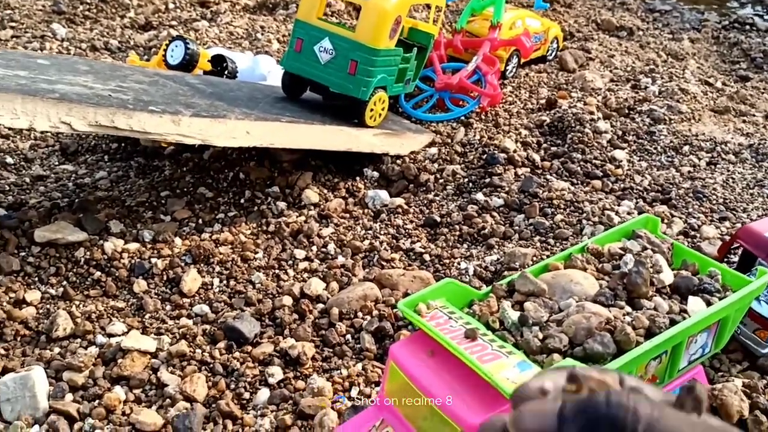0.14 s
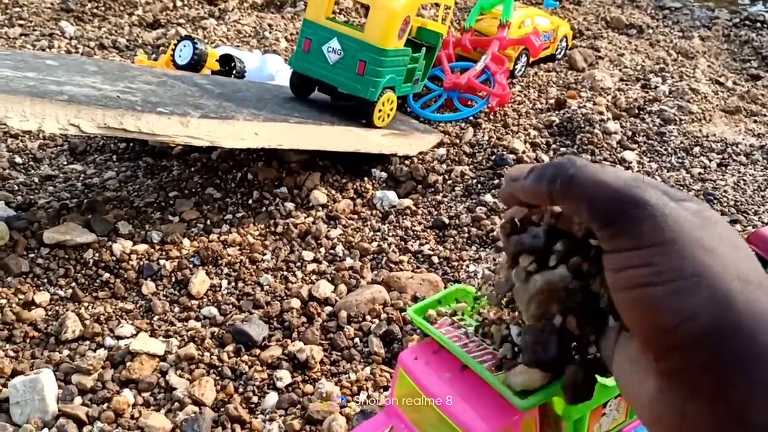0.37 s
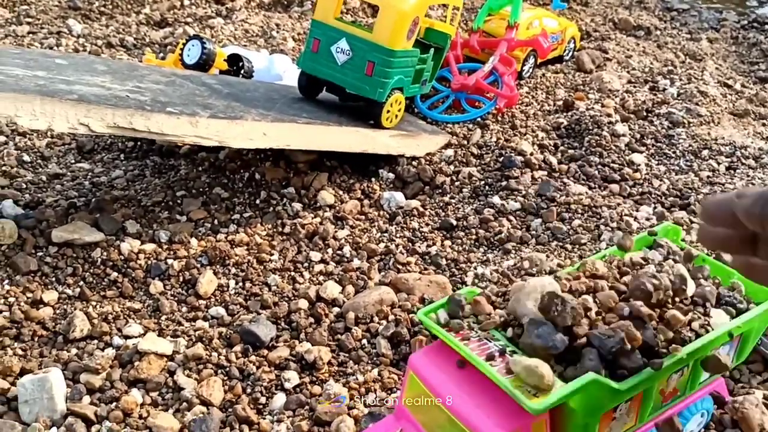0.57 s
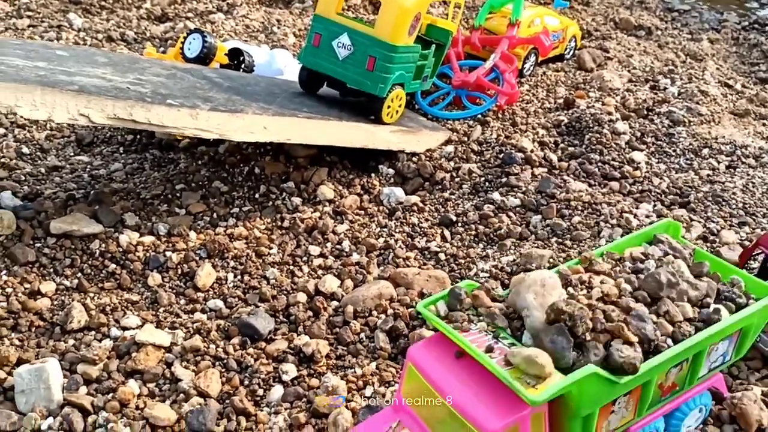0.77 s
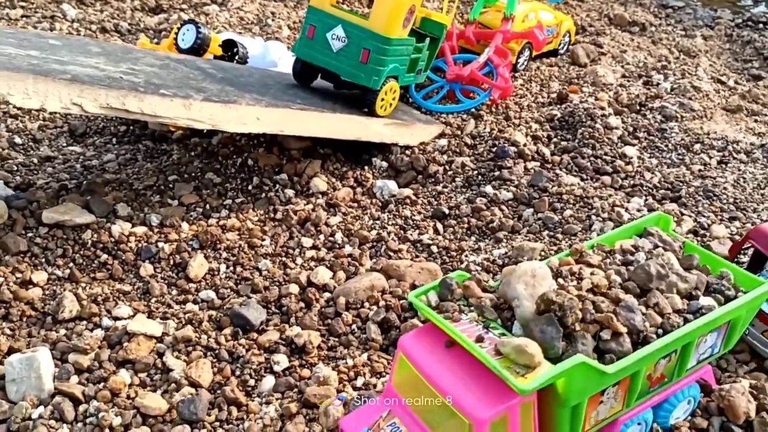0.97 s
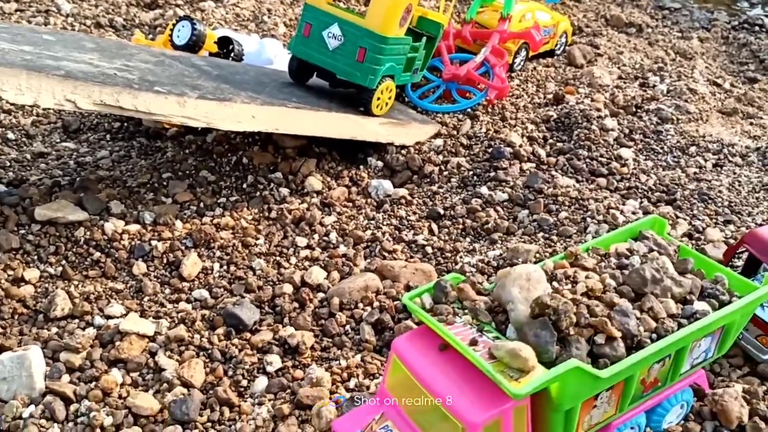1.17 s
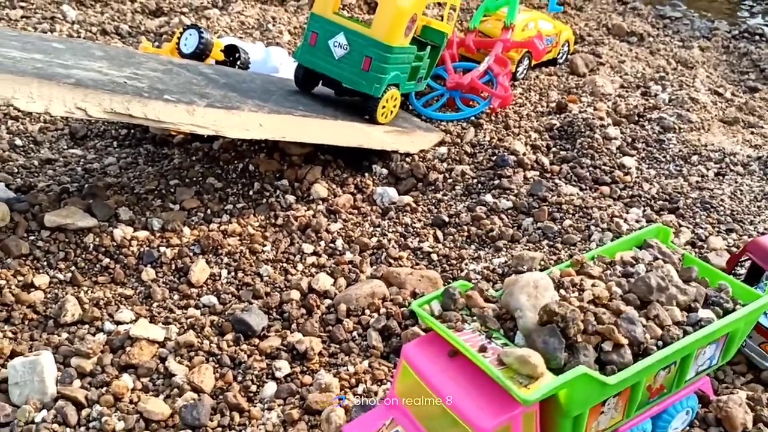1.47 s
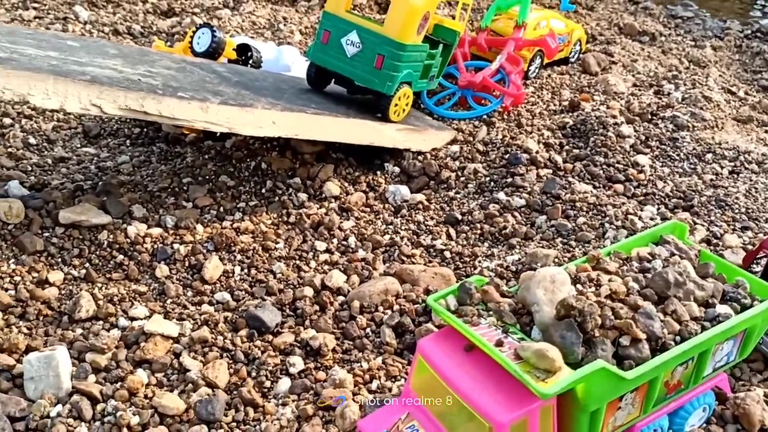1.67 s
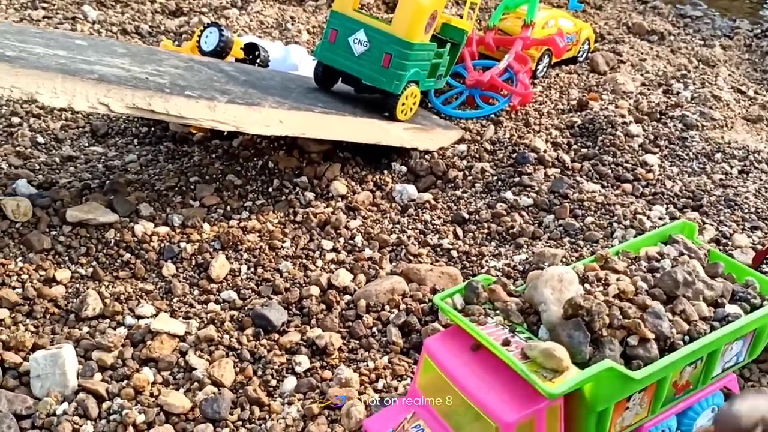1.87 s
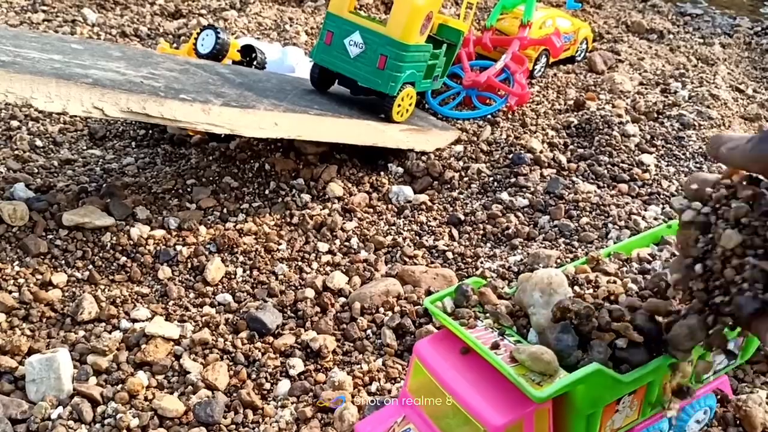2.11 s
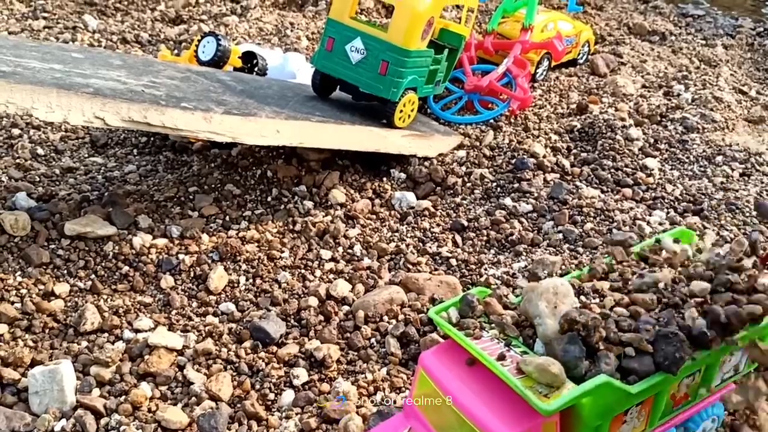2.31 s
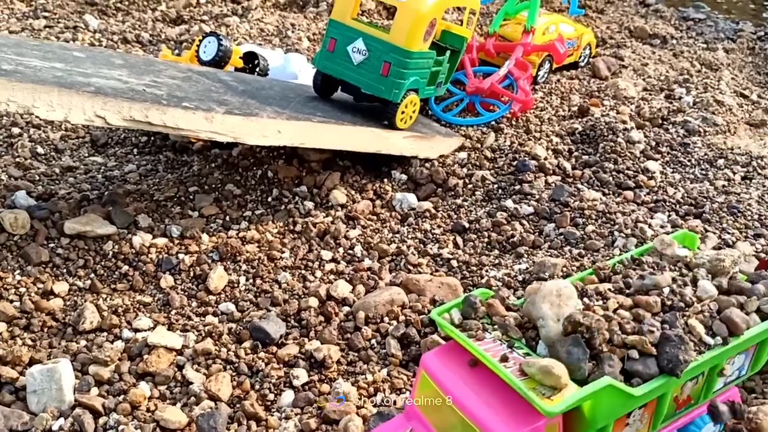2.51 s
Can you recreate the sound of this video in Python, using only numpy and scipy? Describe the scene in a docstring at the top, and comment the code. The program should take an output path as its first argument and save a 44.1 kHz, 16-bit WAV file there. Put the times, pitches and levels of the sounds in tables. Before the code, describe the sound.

Two short gravel pours clatter into a small plastic truck bed, separated by a softer, crisp scrape of fingers scooping stony ground. Close and dry, open air with a faint low rumble beneath.

```python
"""Outdoor air hisses and rumbles faintly throughout, as filtered noise; grit crackles in a hand as sparse ticks.
A handful of gravel and damp soil is poured into the part-filled plastic bed of a toy truck, close by:
pebbles tick, clack and clink and knock the bed as timed filtered impacts, and grit streams as showers of grains.
A hand then rakes the next handful from the stony ground, in denser grains and a dull rub; a second pour follows."""
import sys
import numpy as np
from scipy import signal
from scipy.fft import rfft, irfft, next_fast_len
from scipy.io import wavfile
from scipy.ndimage import uniform_filter1d, minimum_filter1d, map_coordinates

SR = 44100
rng = np.random.default_rng(int(sys.argv[2]) if len(sys.argv) > 2 else 0)


def persist_wave(psi):
    """Save psi, clipped to +-1, as 16-bit WAV."""
    counts = np.round(np.clip(psi, -1, 1) * 32767).astype(np.int16)
    wavfile.write(sys.argv[1], SR, np.atleast_2d(counts).T)


N = 116865

TOP_HZ = 15900  # band limit
LEVEL_WINDOW_S = 0.004  # an impact's level spreads its whole energy over this time
ATTACK_S = 0.00046  # time constant of a contact's rise
TICK_T60_S, CLACK_T60_S = 0.0039, 0.0083
CHATTER_DB, CHATTER_T60_S = -21.5, 0.019  # neighbours shaken by each impact
STONE_SPREAD_DB = 3.5  # uneven colour, drawn for each impact
PITCH_RANGE_OCT = 0.46  # small contacts differ by up to this, either way
CLUMP_DB, CLUMP_KNOTS_PER_S = 1.5, 90  # grit moves in small clumps
FADE_20DB_S = 0.059  # time to fall 20 dB outside a level curve

# Stony clack spectrum: freq_hz, relative_density_db
CLACK_COLOUR = [(100, -55), (400, -25.5), (1200, -8.5), (1700, -8.5), (2200, -2.5), (2700, -2.5),
                (3600, 4.5), (4400, 3), (5200, 3), (6500, -1.5), (10000, -14)]
# Plastic bed spectrum, before pitch shifting: freq_hz, relative_density_db
BED_COLOUR = [(40, -58), (100, -32), (200, -26.5), (400, -11), (560, -11), (740, -2.5), (980, 7.5),
              (1250, -4.5), (1550, -5.5), (2000, -5.5), (4000, -13.5), (12000, -23.5)]
# Spectrum of raked or held grit: freq_hz, relative_density_db
RAKED_GRIT_COLOUR = [(100, -27), (1000, -18.5), (3000, -10), (4500, -1), (6200, -2), (7900, 5.5),
                     (10000, -4), (12500, 1.5), (15500, 3.5)]


def amp(db):
    """Decibels to gain."""
    return 10 ** (np.asarray(db) / 20)


def unit(x):
    """Scale to rms 1."""
    return x / np.sqrt(np.mean(x ** 2) + 1e-20)


def wobble(knots_per_s):
    """Smooth random curve through normally distributed knots."""
    knots = rng.standard_normal(int(N * knots_per_s / SR) + 4)
    return map_coordinates(knots, [np.arange(N) * knots_per_s / SR])


def response(colour, size=2048):
    """Minimum-phase impulse response of a colour, attenuated above the band limit."""
    hz, db = np.transpose(colour)
    freq_hz = np.fft.rfftfreq(size, 1 / SR)
    closing_db = np.interp(freq_hz, [TOP_HZ, TOP_HZ + 1500], [0, -30])
    colour_db = np.interp(np.log(freq_hz + 1), np.log(hz), db)
    cepstrum = irfft(np.log(amp(colour_db + closing_db)))
    # fold the cepstrum to make the response causal
    cepstrum[1:size // 2] *= 2
    cepstrum[size // 2 + 1:] = 0
    return irfft(np.exp(rfft(cepstrum)))[:size // 2]


def coloured(x, colour):
    """Filter x through a colour, to rms 1."""
    return unit(signal.fftconvolve(x, response(colour))[:len(x)])


def levels(rows):
    """One gain curve per dB column, fading outside the rows' span."""
    t = np.arange(N) / SR
    time_s, *columns_db = np.transpose(rows)
    outside_s = np.maximum(time_s[0] - t, 0) + np.maximum(t - time_s[-1], 0)
    fade_db = -20 * outside_s / FADE_20DB_S
    return [amp(np.interp(t, time_s, db) + fade_db) for db in columns_db]


def burst(t60_s, size=1800):
    """One contact: a noise jolt that dies in milliseconds, then faint chatter."""
    t = np.arange(size) / SR
    jolt = amp(-60 * t / t60_s)
    chatter = amp(CHATTER_DB - 60 * t / CHATTER_T60_S)
    rise = 1 - np.exp(-t / ATTACK_S)
    return rng.standard_normal(size) * (jolt + chatter) * rise


def grains(colour, per_s, spread_db, t60_s, range_oct=0, count=16):
    """Random shower of tiny contacts of many sizes and count shapes and pitches, at rms 1."""
    out = np.zeros(N)
    for shift in np.linspace(-1, 1, count):
        falls = rng.random(N) < per_s / SR / count
        sizes = amp(spread_db * np.clip(rng.standard_normal(N), -2, 1.5))
        shifted = np.array(colour) * [2 ** (range_oct * shift), 1]
        contact = coloured(burst(t60_s), shifted)
        out += signal.fftconvolve(falls * sizes, contact)[:N]
    return unit(out)


def clumps():
    """Random gain as grit bunches up and thins out."""
    return amp(CLUMP_DB * wobble(CLUMP_KNOTS_PER_S))


def add_at(out, start_s, db, hit):
    """Add a hit of rms 1, its level set by its energy."""
    gain = amp(db) * np.sqrt(LEVEL_WINDOW_S * SR / len(hit))
    out[round(start_s * SR):][:len(hit)] += gain * hit


def add_impact(out, start_s, db, colour, push):
    """Filter a push through a randomly uneven colour and add it."""
    hz, colour_db = np.transpose(colour)
    uneven_db = colour_db + STONE_SPREAD_DB * rng.standard_normal(len(hz))
    add_at(out, start_s, db, coloured(push, np.transpose([hz, uneven_db])))


def air():
    """Near-steady outdoor hiss with a low, distant rumble: filtered noise."""
    # Air spectrum: freq_hz, relative_density_db
    air_colour = [(30, -43), (55, -10), (82, 4.5), (115, -4), (200, -2.5), (320, -9), (480, -7.5),
                  (1100, -20), (2400, -20.5), (6000, -15.5), (7800, -6.5), (10000, -18.5), (12500, -18),
                  (15500, 5)]
    level_db = -43.5 + 0.22 * wobble(8.1)
    return amp(level_db) * coloured(rng.standard_normal(N), air_colour)


def handful():
    """Sparse small ticks as the held stones shift and crumbs drop."""
    # Grit crackling in the hand: time_s, level_db
    crackle_rows = [(0, -40.5), (.2, -38.5), (.3, -44.5), (1.5, -46.5), (1.62, -41.5), (1.88, -45.5),
                    (2.0, -45), (2.65, -39)]
    level, = levels(crackle_rows)
    return level * grains(RAKED_GRIT_COLOUR, per_s=280, spread_db=3.5, t60_s=0.0015)


def pebbles():
    """Stone on stone: a very short tick over a slightly longer clack."""
    # Sharp tick spectrum: freq_hz, relative_density_db
    tick_colour = [(150, -81), (1000, -41), (2500, -44), (4000, -9.5), (6000, -3), (7500, 5), (8500, 1),
                   (10000, -5.5), (12500, -6), (15500, -1.5)]
    # Pebble impacts: start_s, tick_db, clack_db (before trim), tick_top_db (more for small stones)
    click_rows = [(0.0438, -36, -33, -13), (0.118, -26, -59, 21.5), (0.2421, -31, -26, 6),
                  (0.2517, -29.5, -26.5, 6), (0.2672, -27, -30.5, 16), (0.295, -15.5, -30, -11),
                  (0.2958, -22, -32, 4), (0.3023, -22, -35, 1), (0.3308, -16.5, -25.5, 5),
                  (0.3554, -20.5, -27.5, 0), (0.3705, -21.5, -27.5, 10), (0.4035, -20.5, -31, 18),
                  (0.4074, -17.5, -32, 10), (0.4268, -19.5, -25, 12), (0.4337, -30, -27, 6),
                  (0.447, -22.5, -21.5, 5), (0.4804, -22, -38, 21), (0.506, -29, -28, -4),
                  (0.5123, -19, -23, -13), (0.5237, -19, -30, -4), (0.5514, -20, -20.5, -3),
                  (0.58, -22.5, -38, -3), (0.5974, -24, -39, -13), (0.6244, -24, -30, -1),
                  (0.6367, -23, -34, -7), (0.66, -26, -44, 18), (0.6721, -22, -29.5, -8),
                  (0.7008, -29, -33, 10), (0.7154, -30.5, -34, 0), (0.7652, -18, -32, 20),
                  (0.8007, -26.5, -35.5, -1), (0.8825, -27.5, -41, 4), (0.9135, -25.5, -40.5, 0.5),
                  (1.07, -21, -54, 13), (1.0767, -27, -53, 9), (1.6033, -24.5, -39.5, -2),
                  (1.7824, -27, -65, 22), (1.9564, -18, -35, -5), (2.0281, -18, -28.5, 14.5),
                  (2.0604, -23, -25.5, 4), (2.0744, -23, -27.5, 6), (2.1017, -27, -28, 3),
                  (2.1341, -17.5, -23.5, 0), (2.1477, -17.5, -24.5, 4), (2.152, -24, -21.5, -4),
                  (2.1566, -16.5, -24.5, -8), (2.1609, -23, -18, -5), (2.1786, -23, -27, 12),
                  (2.2018, -18, -32, 4), (2.2096, -17, -26, 0), (2.2177, -20, -15.5, -8),
                  (2.221, -15, -18, -6), (2.2383, -19.5, -21, -1), (2.2419, -29, -20.5, -7),
                  (2.2547, -23, -17, 5), (2.26, -24, -22, 6), (2.2814, -25, -24, -12),
                  (2.288, -24, -25, -17), (2.3177, -19, -22.5, -39), (2.343, -23.5, -37, 2),
                  (2.3776, -21, -29, -4), (2.4043, -22, -19, -14), (2.4198, -42, -22, 2),
                  (2.4275, -31, -29, 0), (2.4399, -22.5, -27, -19), (2.52, -20, -35, 20),
                  (2.527, -17.5, -28.5, 20), (2.5843, -27, -59, 20), (2.598, -31.5, -38.5, -4)]
    tick_trim_db, clack_trim_db = -1, -0.5
    out = np.zeros(N + SR)
    for start_s, tick_db, clack_db, top_db in click_rows:
        tick = [(hz, db + top_db * np.interp(hz, [7500, 14000], [0, 1])) for hz, db in tick_colour]
        add_impact(out, start_s, tick_db + tick_trim_db, tick, burst(TICK_T60_S))
        add_impact(out, start_s, clack_db + clack_trim_db, CLACK_COLOUR, burst(CLACK_T60_S))
    return out[:N]


def pour(rows):
    """Fine grit and small stones patter on the pile in clumps; heavier crumbs drum on the bed."""
    # Poured grit spectrum: freq_hz, relative_density_db
    grit_colour = [(100, -49), (700, -16), (2000, -10), (3700, 1), (6000, -0.5), (7800, 5.5), (10000, -3.5),
                   (12500, -2.5), (15500, 6)]
    treble, middle = levels(rows)
    grit = grains(grit_colour, per_s=1000, spread_db=5.5, t60_s=0.0051)
    stones = grains(CLACK_COLOUR, per_s=170, spread_db=2.5, t60_s=TICK_T60_S, range_oct=PITCH_RANGE_OCT)
    crumbs = grains(BED_COLOUR, per_s=450, spread_db=5.0, t60_s=0.0051, range_oct=PITCH_RANGE_OCT)
    patter = treble * (amp(-2.5) * grit + amp(-9.5) * stones)
    drumming = amp(-1) * middle * crumbs
    return clumps() * (patter + drumming)


def knocks():
    """The loaded bed answers a blow and its rattle with a dead, hollow knock, pitched by landing place."""
    # Heavier pebbles on the bed: start_s, level_db (before trim), pitch_hz
    knock_rows = [(0.2519, -32, 1170), (0.2794, -35, 1260), (0.3016, -26, 1270), (0.4345, -27.5, 1020),
                  (0.4475, -16, 950), (0.466, -30, 890), (0.4797, -32, 1050), (0.5055, -19, 1010),
                  (0.5127, -29, 636), (0.516, -21.5, 920), (0.523, -31.5, 450), (0.551, -26, 756),
                  (0.5535, -19.5, 1050), (0.5965, -29.5, 980), (0.6371, -32, 910), (0.7165, -28.5, 1000),
                  (0.768, -32.5, 1850), (0.9087, -35.5, 1090), (2.0288, -33, 870), (2.1607, -36, 593),
                  (2.2097, -25.5, 1140), (2.2185, -26, 1006), (2.2425, -27, 1400), (2.2539, -30, 1130),
                  (2.2646, -29, 1130), (2.2867, -21, 970), (2.2943, -21, 1050), (2.3173, -24, 1510),
                  (2.3184, -26, 780), (2.3515, -25.5, 1180), (2.3793, -28.5, 980), (2.4044, -27, 960),
                  (2.4195, -24, 1000), (2.4396, -29.5, 900), (2.529, -38.5, 1600), (2.6277, -38, 1440),
                  (2.6295, -35.5, 810)]
    trim_db, t60_s = -0.5, 0.0079
    bed_hz = 993  # pitch at which the bed's colour is given
    roughness = 0.45  # rattle of the load, relative to the clean blow
    out = np.zeros(N + SR)
    for start_s, db, pitch_hz in knock_rows:
        rattle = burst(t60_s)
        blow = signal.unit_impulse(len(rattle))
        push = blow + roughness * rattle / np.linalg.norm(rattle)
        add_impact(out, start_s, db + trim_db, np.array(BED_COLOUR) * [pitch_hz / bed_hz, 1], push)
    return out[:N]


def clinks(size=1800):
    """A flat stone rings in one sine mode, damped at once by the pile."""
    # Flat stones: start_s, level_db, pitch_hz
    clink_rows = [(0.448, -20, 2380), (0.7162, -29.5, 4300), (0.8018, -33, 5570), (2.0278, -32.5, 3610),
                  (2.2096, -24, 3140), (2.255, -23, 4060), (2.351, -26, 3830)]
    t60_s = 0.0061
    t = np.arange(size) / SR
    envelope = amp(-60 * t / t60_s) * (1 - np.exp(-t / ATTACK_S))
    out = np.zeros(N + SR)
    for start_s, db, pitch_hz in clink_rows:
        ring = np.sin(2 * np.pi * pitch_hz * t) * envelope
        add_at(out, start_s, db, unit(ring))
    return out[:N]


def scoop():
    """Fingers rake the ground: dense crunch and trickling crumbs over scraping soil and a dull rub."""
    # Raking levels, before layer trims: time_s, treble_db, middle_db
    scoop_rows = [(.9, -53, -54), (.925, -32.5, -49.5), (1.0, -30, -50), (1.12, -32.5, -50.5),
                  (1.18, -29, -43.5), (1.29, -32, -45.5), (1.36, -37, -49.5), (1.44, -39, -55.5),
                  (1.58, -48, -53)]
    # Scraped soil spectrum: freq_hz, relative_density_db
    soil_colour = [(100, -10), (400, -2.5), (700, 0.5), (1300, -3.5), (2100, -2.5), (3500, -7.5),
                   (7000, -17.5)]
    # Hand rubbing the ground, spectrum: freq_hz, relative_density_db
    rub_colour = [(40, -23), (130, 0), (700, -7), (1200, -27)]
    rub_db = -55
    treble, middle = levels(scoop_rows)
    contact, = levels([(scoop_rows[0][0], rub_db), (scoop_rows[-1][0], rub_db)])
    grit = grains(RAKED_GRIT_COLOUR, per_s=3300, spread_db=6.5, t60_s=0.002)
    trickle = grains(CLACK_COLOUR, per_s=260, spread_db=7.5, t60_s=CLACK_T60_S)
    soil = grains(soil_colour, per_s=800, spread_db=6.5, t60_s=0.0065)
    crunch = clumps() * (amp(-1.8) * treble * grit + amp(0.5) * middle * trickle)
    scrape = amp(-0.5) * middle * soil
    rub = contact * coloured(rng.standard_normal(N), rub_colour)
    return crunch + scrape + rub


def ground(x, size=6000):
    """Short scatter from the ground and the toys around: x convolved with decaying noise."""
    t60_s = 0.035
    tail = rng.standard_normal(size) * amp(-60 * np.arange(size) / SR / t60_s)
    return signal.fftconvolve(x, tail / np.linalg.norm(tail))[:N]


def scene():
    """Everything reaches one microphone, alike in both channels."""
    # Grit streams, before layer trims: time_s, treble_db, middle_db
    first_pour_rows = [(.23, -58, -78), (.33, -37.5, -41.5), (.41, -22.5, -37), (.5, -27, -34),
                       (.57, -28.5, -35), (.73, -38.5, -51), (.82, -48, -56)]
    # Same columns: time_s, treble_db, middle_db
    second_pour_rows = [(2.11, -46, -62), (2.2, -32, -58), (2.28, -23, -38.5), (2.37, -25, -39.5),
                        (2.47, -30.5, -41.5), (2.56, -49, -62)]
    impacts = pebbles() + knocks() + clinks()
    streams = pour(first_pour_rows) + pour(second_pour_rows)
    gravel = handful() + impacts + streams + scoop()
    scatter_db = -14
    mono = air() + gravel + amp(scatter_db) * ground(gravel)
    return np.array([mono, mono])


def record(dry, size=65):
    """The recorder limits the highest peaks and keeps nothing above its band limit."""
    ceiling = 0.9
    needed_gain = ceiling / np.maximum(np.abs(dry), ceiling)
    gain = uniform_filter1d(minimum_filter1d(needed_gain, size), size)
    m = next_fast_len(N + SR // 2)
    passband = np.fft.rfftfreq(m, 1 / SR) < TOP_HZ
    return irfft(rfft(dry * gain, m) * passband, m)[:, :N]


dry = scene()
out = record(dry)
persist_wave(out)
```